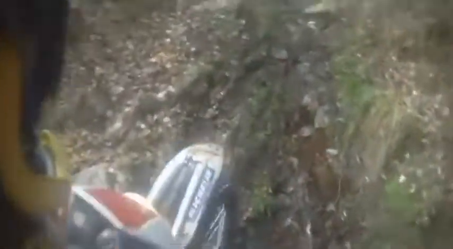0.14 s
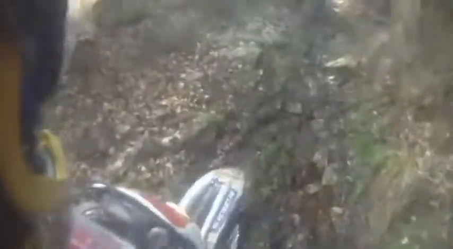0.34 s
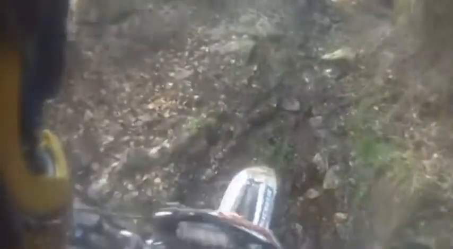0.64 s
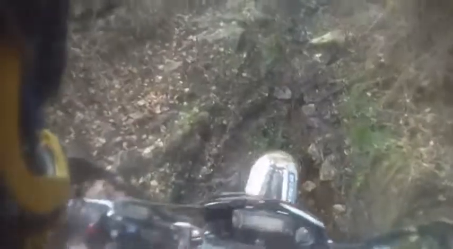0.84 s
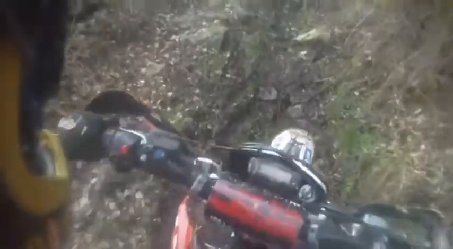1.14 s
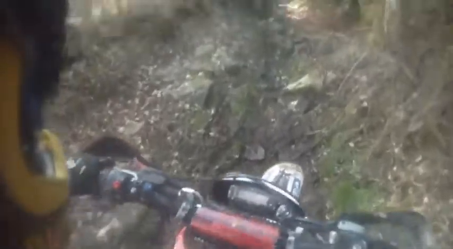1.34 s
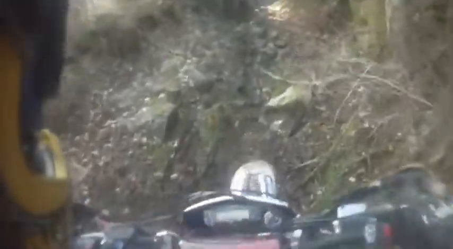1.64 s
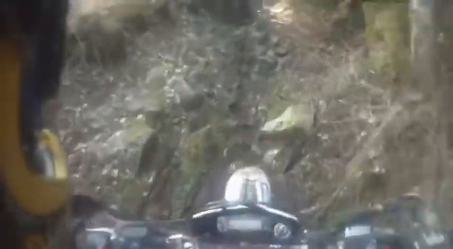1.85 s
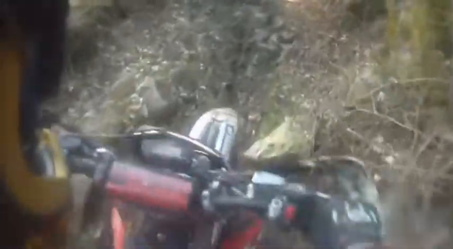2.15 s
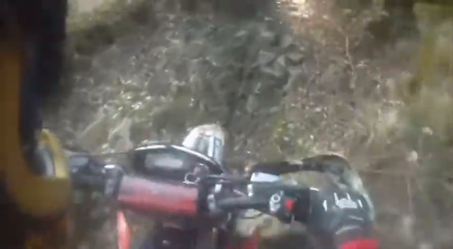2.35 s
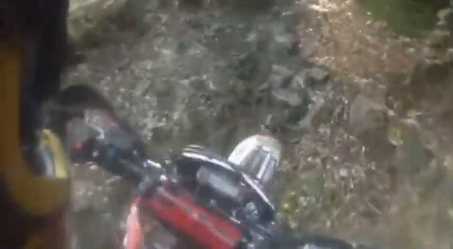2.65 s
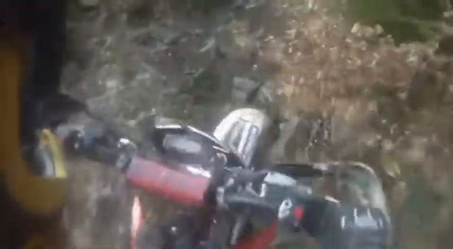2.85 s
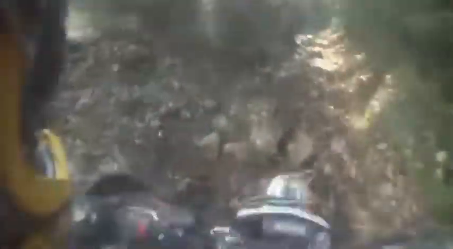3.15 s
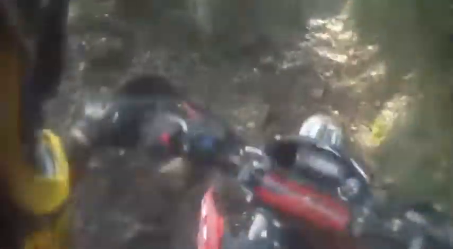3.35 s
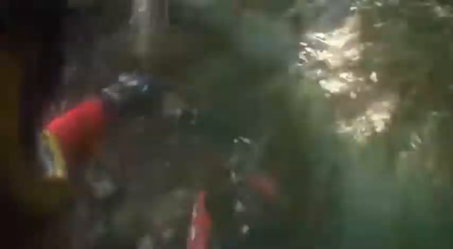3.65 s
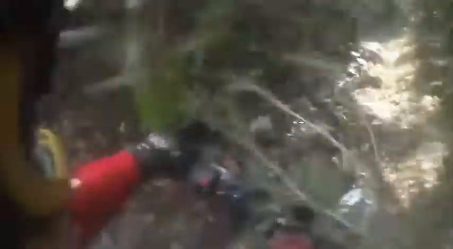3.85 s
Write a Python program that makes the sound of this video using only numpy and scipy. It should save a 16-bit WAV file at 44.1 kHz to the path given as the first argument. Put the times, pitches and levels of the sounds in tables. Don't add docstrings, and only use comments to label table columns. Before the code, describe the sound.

A single-cylinder motorcycle drones and rattles, muffled, until a burst of loud knocks as it tips

```python
import sys
import numpy as np
from scipy import signal
from scipy.fft import rfft, irfft
from scipy.io import wavfile
from scipy.ndimage import uniform_filter1d, minimum_filter1d, map_coordinates

SR = 44100
rng = np.random.default_rng(int(sys.argv[2]) if len(sys.argv) > 2 else 0)


def file_out(sig):
    cols = np.atleast_2d(sig).T
    lim = np.clip(cols, -1, 1)
    pcm = np.round(lim * 32767).astype(np.int16)
    wavfile.write(sys.argv[1], SR, pcm)


def voltage_ratio(level):
    return 10 ** (np.asarray(level, float) / 20)


N = 176400
TIME = np.arange(N) / SR


def unit(x):
    return x / np.sqrt(np.mean(x ** 2) + 1e-20)


def along(points, hz):
    f, db = np.transpose(points)
    return np.interp(np.log(hz + 1), np.log(f + 1), db)


def curves(rows):
    s, *columns = np.transpose(rows)
    return [np.interp(TIME, s, column) for column in columns]


def noise():
    return rng.standard_normal(N)


def wobble(rate):
    return map_coordinates(rng.standard_normal(int(N * rate / SR) + 4), [np.arange(N) * rate / SR])


def filtered(x, gain):
    m = 2 ** 18
    c = irfft(np.log(gain(np.fft.rfftfreq(m, 1 / SR)) + 1e-6), m)
    c[1:m // 2] *= 2
    c[m // 2 + 1:] = 0
    return irfft(rfft(x, m) * np.exp(rfft(c)), m)[:N]


def both_ways(x, gain):
    return unit(irfft(rfft(x) * gain(np.fft.rfftfreq(N, 1 / SR)), N))


def peaks(table, f):
    power = 0
    for centre, width, db in table:
        shape = (f * width) ** 2 / ((centre * centre - f * f) ** 2 + (f * width) ** 2)
        power = power + (voltage_ratio(db) * shape) ** 1.594
    return np.sqrt(power)


def housing(x, bright_db=0):
    # pitch_hz, width_hz, level_db
    shell_modes = [(1683, 157, -1), (1872, 187, -1), (2460, 434, -1.5), (2938, 310, -5.5), (3492, 564, 0),
                   (4524, 560, -8), (5550, 1920, -10.5), (7144, 730, -3.5), (9660, 1450, -20.5)]
    # pitch_hz, level_db
    shell_leak = [(150, -42), (700, -20), (1250, -19), (4000, -17), (9000, -16), (12000, -33),
                  (13500, -121), (16000, -79)]

    def shell(f):
        tilt = voltage_ratio(bright_db * np.clip(np.log2((f + 1) / 4000), 0, 1))
        notch = 1 - 0.88 / (1 + ((f - 6160) / 120) ** 2)
        return np.hypot(peaks(shell_modes, f), voltage_ratio(along(shell_leak, f))) * tilt * notch

    return filtered(x, shell)


def engine():
    # time_s, firings_per_s
    firing_speed = [(0.0, 37.83), (0.633, 35.54), (0.813, 46.36), (0.97, 39.31), (1.128, 31.94),
                    (1.384, 35.67), (1.548, 31.75), (1.728, 35.34), (1.925, 35.78), (2.153, 34.58),
                    (2.41, 31.92), (2.638, 38.95), (2.852, 34.54), (3.083, 31.71), (3.247, 36.79),
                    (3.445, 41.3), (3.56, 37.2), (4.0, 40)]
    # time_s, thump_db, clatter_db, boom_share (0 = none)
    engine_load = [(0, -80, -53.5, 0), (.236, -71, -60, 0.1), (.245, -55.5, -45.5, 0), (.335, -62, -47, 0),
                   (.36, -71, -50.5, 0), (.55, -72.5, -56, 0), (.575, -57, -50.5, 0), (.75, -63, -48, 1.25),
                   (.98, -61.5, -49, 0.66), (1.38, -57.5, -46.5, 0.6), (1.45, -60, -49.5, 0.15),
                   (1.8, -59, -46, 0.65), (2.2, -60.5, -50, 0.35), (2.44, -55.5, -47.5, 0.22),
                   (2.72, -61, -47, 0.45), (3.02, -60, -49.5, 0.32), (3.15, -57, -46, 1.3),
                   (3.55, -62, -45, 1.3)]
    speed = uniform_filter1d(curves(firing_speed)[0], size=3500)
    turns = 0.505 + np.cumsum(speed) / SR
    firings = np.flatnonzero(np.diff(np.floor(turns)))
    thump_db, clatter_db, boom = curves(engine_load)
    thump = voltage_ratio(thump_db) * exhaust(turns, speed, firings, boom)
    return thump + voltage_ratio(clatter_db + 1.0) * clatter(turns, firings)


def exhaust(turns, speed, firings, boom):
    # pitch_hz, width_hz, level_db
    pipe_modes = [(244, 75, -0.5), (332, 85, 2), (487, 72, -2.5), (593, 50, -7.5)]
    # multiple_of_firing_rate, level_db
    drone_tones = [(6, 2), (7, -4), (8, -9), (9, 1), (10, -4)]
    low_hz, drone_top_hz = 205, 350
    jitter_s, scatter_db = 0.00006, 0.8
    port_lead_s, port_share = 0.00386, 0.59

    def pipe(x):
        return both_ways(x, lambda f: peaks(pipe_modes, f) / (1 + (low_hz / (f + 1)) ** 6))

    late = (rng.standard_normal(len(firings)) * jitter_s * SR).astype(int)
    fire = np.zeros(N)
    fire[np.clip(firings + late + 70, 0, N - 1)] = voltage_ratio(scatter_db * rng.standard_normal(len(firings)))
    fire = fire + port_share * np.roll(fire, -round(port_lead_s * SR))
    puff = pipe(noise() * (3.9 + np.cos(2 * np.pi * (turns + 0.04))))
    drone = np.zeros(N)
    for k, db in drone_tones:
        tone_hz = k * speed
        fade = 1 + (tone_hz / drone_top_hz) ** 20 + (low_hz / tone_hz) ** 10
        drone += voltage_ratio(db + 1.2 * wobble(8)) * np.sin(2 * np.pi * k * turns) / fade
    return unit(pipe(-fire) + 0.15 * puff) + boom * drone


def clatter(turns, firings):
    # pitch_hz, width_hz, level_db
    flicked_modes = [(1820, 300, -14), (3520, 300, -11)]
    ticks_per_s, flecks_per_s = 350, 160
    beat = np.cos(2 * np.pi * (turns + 0.08))

    def chance(per_s):
        return rng.random(N) < (1 + beat) * per_s / SR

    luck = rng.standard_normal(len(firings))
    latest = np.clip(np.searchsorted(firings, np.arange(N) + 500) - 1, 0, None)
    strength = uniform_filter1d(voltage_ratio(2.5 * np.tanh(luck[latest])), size=300)
    swell = 1 + 0.12 * strength * beat
    tick_size = voltage_ratio(3 * np.minimum(rng.exponential(size=N), 2))
    ticks = chance(ticks_per_s) * tick_size * noise()
    flecks = np.zeros(N)
    for centre, width, db in flicked_modes:
        flick = chance(flecks_per_s) * noise()
        flecks += voltage_ratio(db) * both_ways(flick, lambda f: peaks([(centre, width, 0)], f))
    shake = swell * voltage_ratio(0.87 * wobble(16)) * (noise() + voltage_ratio(-8) * unit(ticks))
    return unit(housing(shake)) + flecks


def knocks():
    # start_s, peak_db, decay_s (to -60 dB), brightness_db
    blows = [(3.5094, -11.5, .011, -14.5), (3.5728, -19, 0.0052, -4), (3.7277, -14, 0.013, -32),
             (3.731, -7, 0.012, -32), (3.7384, -16, 0.008, -26), (3.7468, -15, .01, -22),
             (3.7485, -9.5, .015, -28), (3.7554, -6, 0.01, -33), (3.7604, -8.5, 0.021, -34),
             (3.7685, -14, 0.008, -26), (3.772, -15, 0.0073, -26), (3.7804, -22, 0.01, -26),
             (3.7874, -15.5, 0.016, -32), (3.7941, -16.5, .012, -31), (3.8144, -27, 0.0063, -24),
             (3.8213, -9, 0.012, -30), (3.8249, -4.5, 0.012, -31), (3.8315, -4, 0.02, -22),
             (3.8365, -3.5, .02, -25.5), (3.8444, -2.5, 0.015, -26), (3.8614, -13, 0.01, -22),
             (3.8783, -6.5, 0.0069, -32), (3.8884, -22, 0.0047, -23), (3.9014, -30, 0.0087, -32),
             (3.916, -15, .012, -34), (3.9205, -19, 0.03, -43), (3.9558, -24, .03, -30),
             (3.9655, -2.5, 0.014, -0.5), (3.9705, -16, .012, -5), (3.976, -6, 0.011, -13),
             (3.9792, -1.5, 0.011, -23), (3.9964, -9.5, .015, -31)]
    # time_s, level_db
    scrape = [
        (3.72, -70),
        (3.735, -34.5),
        (3.8, -39),
        (3.835, -23.5),
        (3.87, -34.5),
        (3.91, -40),
        (3.95, -39.5),
        (3.97, -33),
        (3.99, -32.5),
        (4, -25),
    ]
    # list of time_s, list of share
    thud_fade = [3.78, 3.82, 3.9], [2.2, 1, .5]
    # pitch_hz, width_hz, level_db
    thud_modes = [(146, 79, 0), (275, 54, 0.5), (450, 150, -4.0), (860, 1600, -12)]
    trim_db, rise_s, thud_db = -7, 0.00071, -9.5
    dull, bright, t = np.zeros(N + SR), np.zeros(N + SR), np.arange(SR // 10) / SR
    for s, db, t60, bright_db in blows:
        blow = voltage_ratio(db + trim_db - 60 * t / t60) * (1 - np.exp(-t / rise_s)) * rng.standard_normal(len(t))
        dull[round(s * SR):][:len(t)] += blow / (1 + voltage_ratio(bright_db))
        bright[round(s * SR):][:len(t)] += blow * voltage_ratio(bright_db)
    grains = unit(noise() * voltage_ratio(4 * wobble(350))) * voltage_ratio(curves(scrape)[0])
    dull = dull[:N] + grains
    push = dull * np.interp(TIME, *thud_fade)
    thud = filtered(push, lambda f: peaks(thud_modes, f))
    soft = filtered(housing(dull, bright_db=-28.5), lambda f: 1 / (1 + (1300 / (f + 1)) ** 6))
    sharp = filtered(housing(bright[:N], bright_db=11),
                     lambda f: 1 / (1 + (4500 / (f + 1)) ** 4 + (f / 12500) ** 8))
    return 5 * soft + 5 * sharp + voltage_ratio(thud_db) * thud


def rings():
    # start_s, level_db, pitch_hz, decay_s (to -60 dB), rise_s
    panel_tones = [(3.7295, 4.5, 3280, 0.0054, 0.00072), (3.7277, -16, 3240, 0.018, 0.00033),
                   (3.829, 0, 3150, 0.0083, 0.00052), (3.8305, -13, 1750, .03, 0.00046),
                   (3.8443, -10, 1760, 0.02, 0.00046), (3.9205, -0.5, 3300, 0.017, 0.0044),
                   (3.92, -14.5, 2635, .03, .003), (3.9656, -17, 7500, 0.016, .0007),
                   (3.9645, -10.5, 8190, .019, .0003), (3.9647, -12, 10400, .012, .0002),
                   (3.9658, -19, 12600, .01, .0002), (3.9645, -10.5, 3470, 0.026, 0.00054),
                   (3.9748, -4.5, 2280, 0.0084, 0.0007), (3.5093, -26, 3250, 0.01, 0.00034)]
    out, t = np.zeros(N + SR), np.arange(SR // 10) / SR
    for s, db, hz, t60, rise in panel_tones:
        envelope = voltage_ratio(db + 1 - 60 * t / t60) * (1 - np.exp(-t / rise))
        out[round(s * SR):][:len(t)] += envelope * np.sin(2 * np.pi * hz * t)
    return out[:N]


def clicks():
    # start_s, level_db, brightness_db
    hits = [(.2446, -33, -12), (3.5094, -24, -6), (3.5731, -22, 2), (3.7294, -13, -14), (3.7394, -13, -20),
            (3.7703, -14, -20), (3.7878, -19, -20), (3.8298, -3, -16), (3.8447, -12, -22),
            (3.862, -12, -13), (3.865, -17, -15), (3.889, -24, -12), (3.9649, -4, 3), (3.9751, 0, -9),
            (3.9793, -7, -7)]
    dull, bright = np.zeros(N), np.zeros(N)
    for s, db, bright_db in hits:
        dull[round(s * SR)] = voltage_ratio(db + 16)
        bright[round(s * SR)] = voltage_ratio(db + 13.5 + bright_db)

    def without_lows(x, hz):
        return filtered(x, lambda f: 1 / (1 + (hz / (f + 1)) ** 6))

    body = without_lows(housing(dull, bright_db=-21), hz=1640)
    return body + without_lows(housing(bright, bright_db=7.5), hz=4500)


def leaves():
    # time_s, level_db
    brushing = [
        (3.05, -64),
        (3.38, -52.5),
        (3.45, -43.5),
        (3.55, -49.5),
        (3.7, -52),
        (3.85, -46),
        (4, -88),
    ]
    # pitch_hz, level_db
    leaf_colour = [(2000, -9), (4500, 7.5), (7200, 21.5), (10000, 5.5), (12500, -3), (15500, -35)]
    brush = noise() * voltage_ratio(2.1 * wobble(60) + 1.6 * wobble(600))
    return voltage_ratio(curves(brushing)[0]) * unit(filtered(brush, lambda f: voltage_ratio(along(leaf_colour, f))))


def wind():
    # pitch_hz, level_db (per Hz)
    wind_colour = [(3, -6.5), (10, -1.5), (20, -19.5), (45, -23.5), (100, -25.5), (170, -27), (230, -31.5),
                   (1000, -47.5)]
    # time_s, level_db
    sway = [
        (0, -55),
        (.5, -68),
        (1.5, -59),
        (2.3, -78),
        (2.5, -66),
        (3.2, -62),
        (3.55, -60),
        (3.7, -44.5),
        (4, -52.5),
    ]
    # middle_s, half_length_s
    quiet_spots = [(.9, .05), (1.1, .03), (1.51, .03), (1.79, .04), (2.0, .07), (2.18, .025), (2.27, .02),
                   (2.39, .015), (2.51, .02), (2.67, .045), (2.8, .03), (2.9, .02), (3.12, .02),
                   (3.25, .02), (3.43, .02)]
    sway_db, = curves(sway)

    def band(low_hz, high_hz):
        return filtered(noise(), lambda f: voltage_ratio(along(wind_colour, f)) * (f >= low_hz) * (f < high_hz))

    slow = band(0, 18)
    lull = sum(np.exp(-((TIME - s) / half) ** 4) for s, half in quiet_spots)
    rumble = band(18, 95) + band(200, SR) + band(95, 200) * voltage_ratio(-20 * lull)
    moving = slow * voltage_ratio(sway_db) + rumble * voltage_ratio(-54.0 + 0.1 * (sway_db + 80.5))
    return moving / np.sqrt(np.mean(slow ** 2))


def hiss():
    return voltage_ratio(-65) * unit(housing(noise(), bright_db=-7))


def scene():
    return (engine() + knocks() + rings() + clicks() + leaves() + wind() + hiss())[None]


def top_cut(x):
    return signal.sosfilt(signal.butter(12, 16670, fs=SR, output="sos"), x)


def record(dry):
    top_hz, loud_top_hz, loud_level, ceiling = 15310, 16670, .007, 1.15
    x = (dry + 0.0058) / (1 + np.abs(dry / ceiling) ** 8) ** (1 / 8)
    hz = np.fft.rfftfreq(N, 1 / SR)

    def below(limit_hz):
        return irfft(rfft(x) * np.clip((limit_hz - hz) / 250, 0, 1), N)

    top = below(loud_top_hz) - below(top_hz)
    nearby = -minimum_filter1d(-np.abs(top), size=400)
    opened = uniform_filter1d(1. * (nearby > loud_level), size=200)
    return top_cut(below(top_hz) + opened * top)


dry = scene()
out = record(dry)
file_out(out)
```